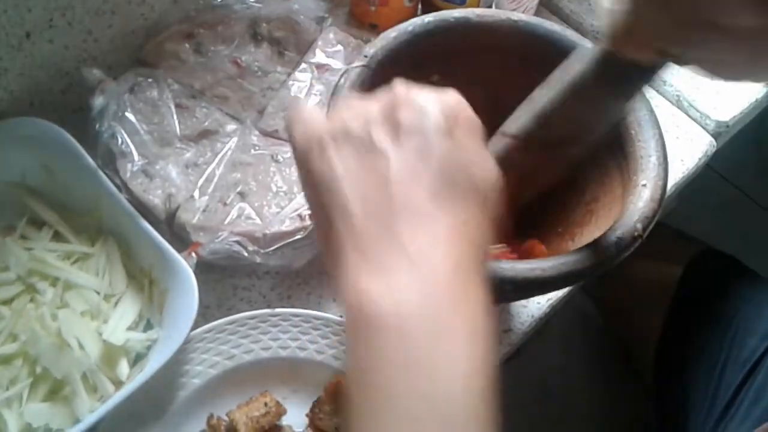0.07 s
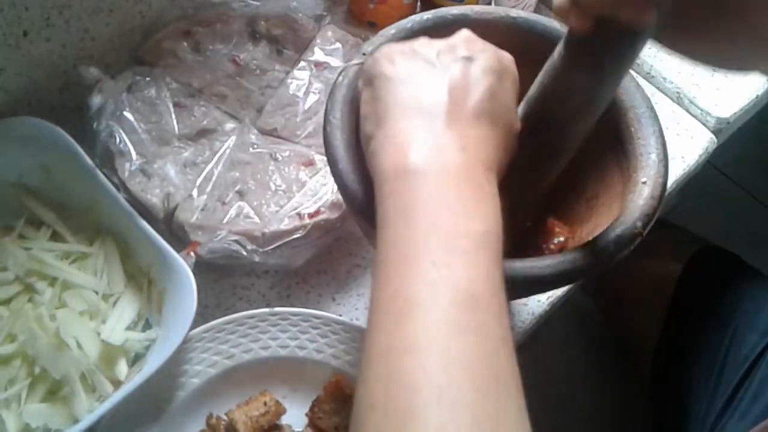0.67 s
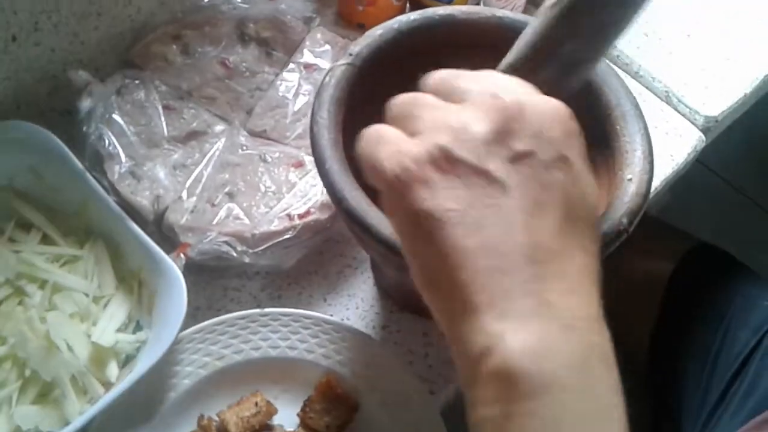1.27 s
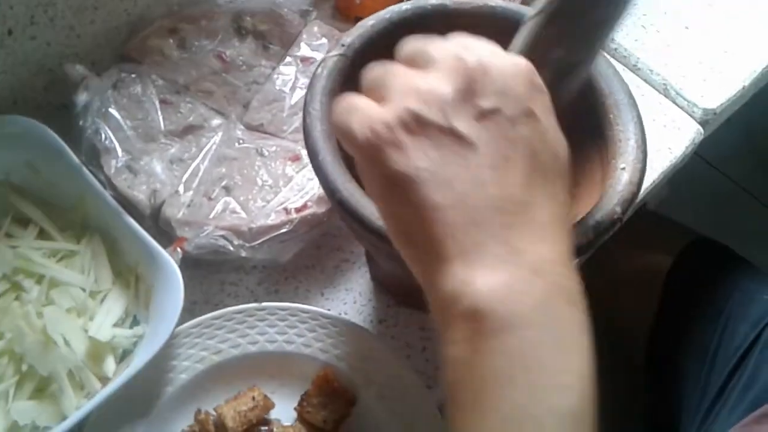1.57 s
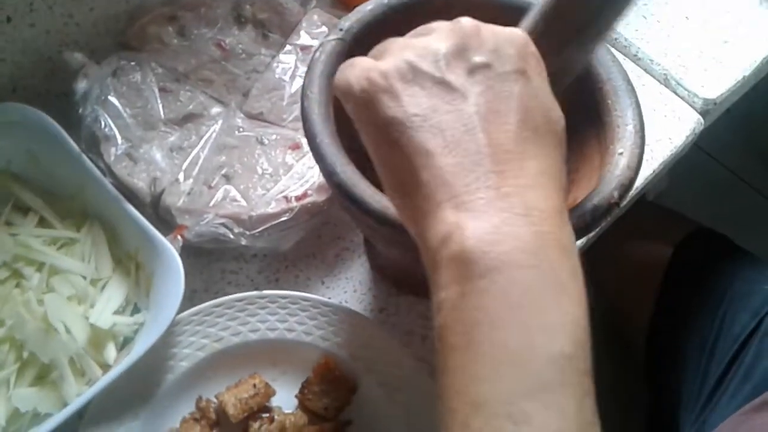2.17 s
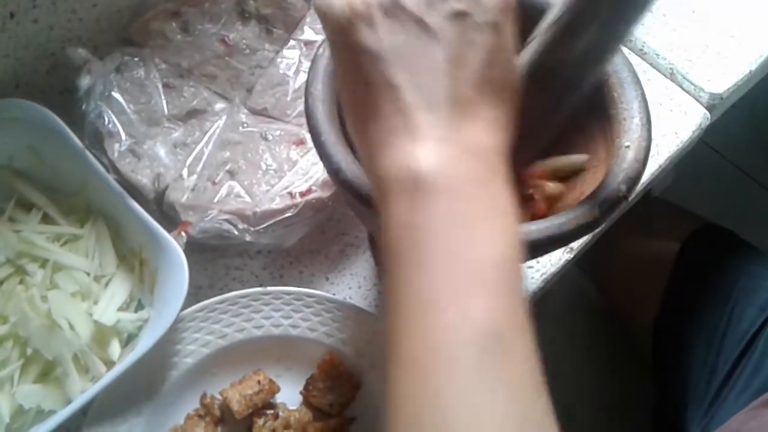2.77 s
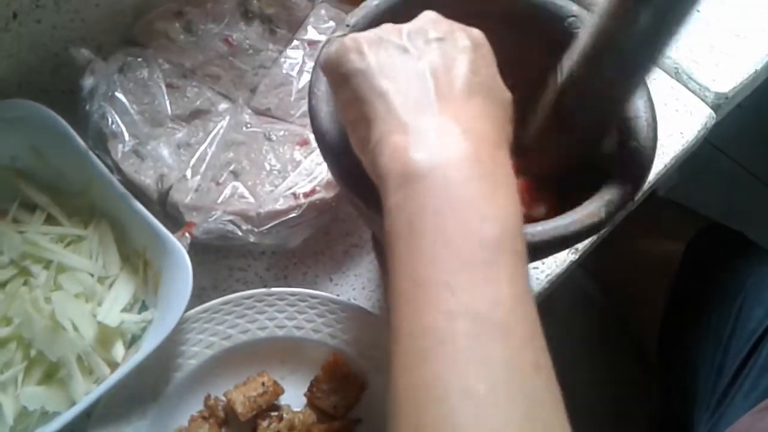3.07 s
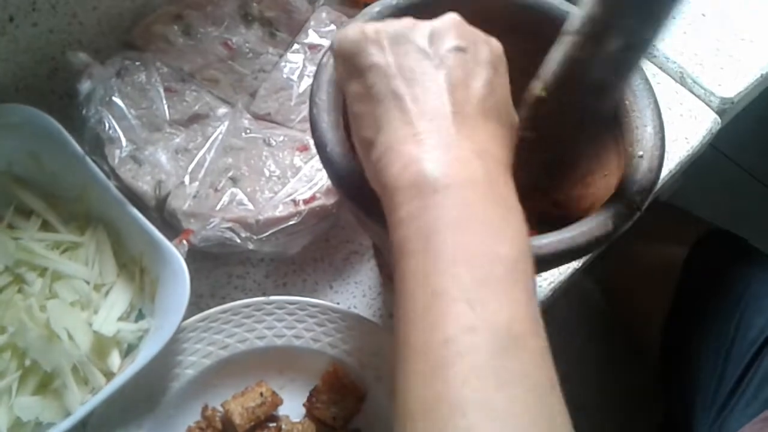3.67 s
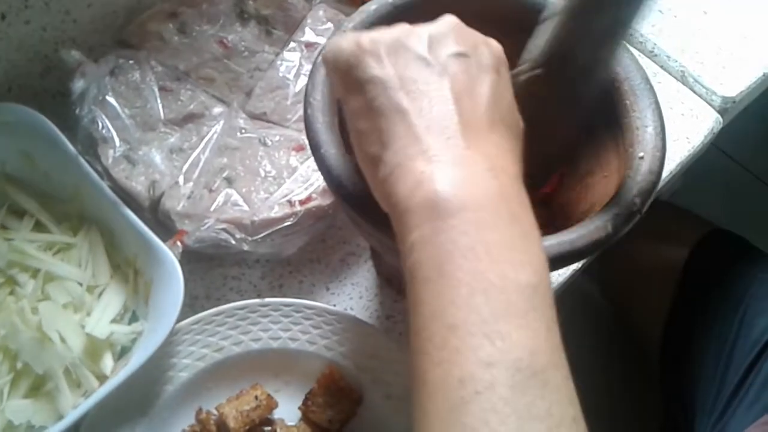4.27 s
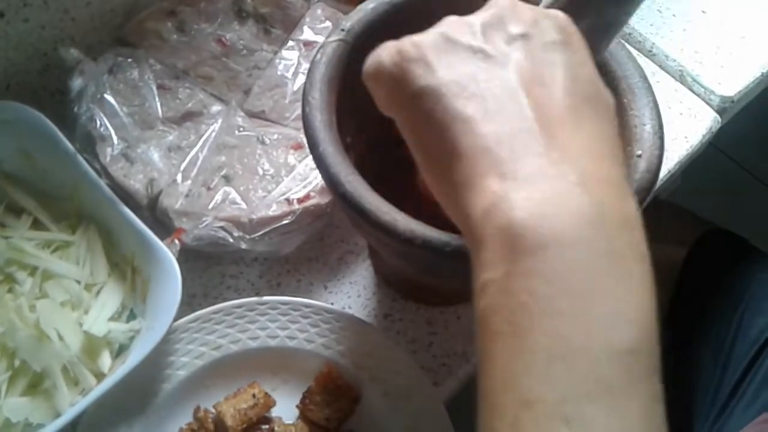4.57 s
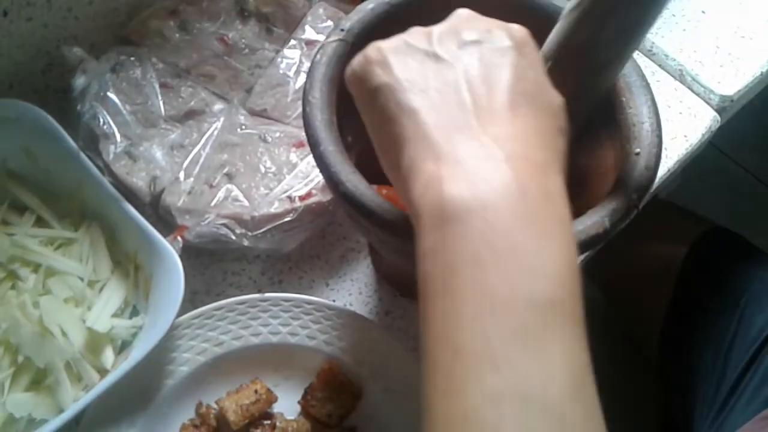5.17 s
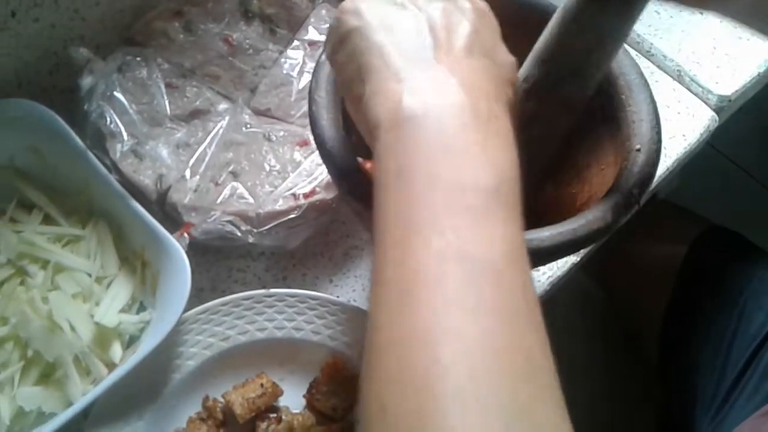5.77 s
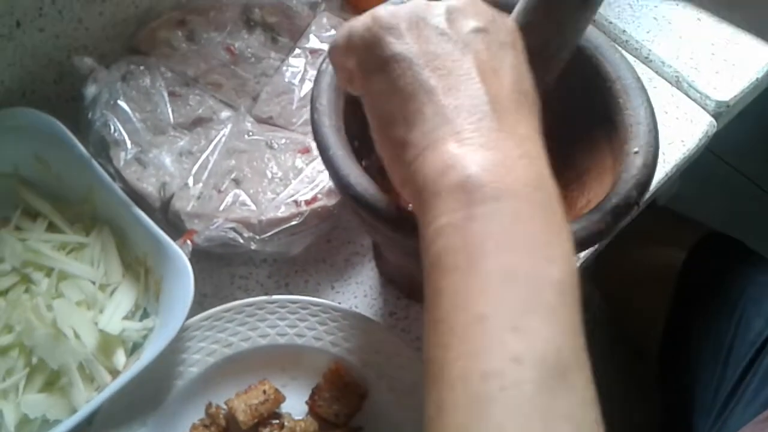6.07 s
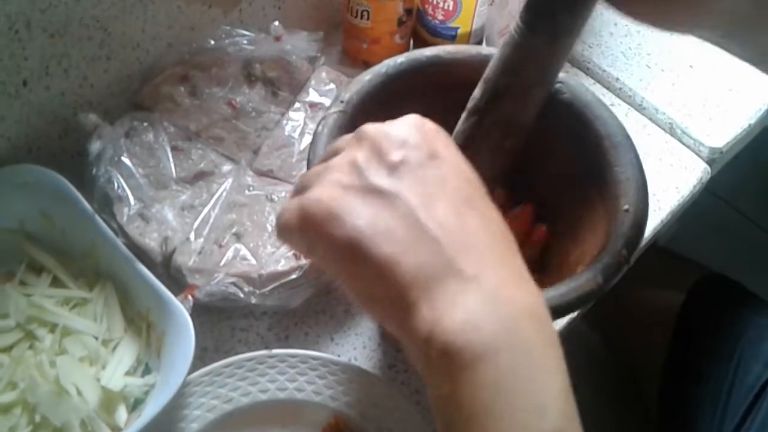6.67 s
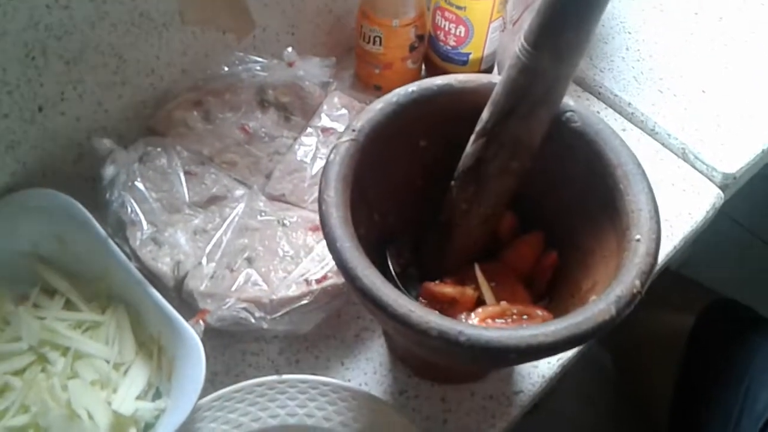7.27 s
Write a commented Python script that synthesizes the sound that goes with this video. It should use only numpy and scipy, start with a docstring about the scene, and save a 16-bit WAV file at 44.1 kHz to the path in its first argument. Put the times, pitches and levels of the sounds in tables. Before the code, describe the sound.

Tomato salad is pounded in a clay mortar, heard up close in a small kitchen. A wooden pestle lands in dull, uneven thuds while the fruit squelches about three times a second, with tiny snaps and squeaks. Between strokes a metal spoon scrapes the gritty wall, and occasionally the pestle knocks bare clay. At the end the spoon clinks brightly against the rim over a faint room hum.

```python
"""A wet squeak, a metal spoon scraping clay, then a squelch: tomato salad is being pounded in a mortar.
The wooden pestle crushes the fruit, snaps its skins and thuds into mortar and counter; between
strokes the spoon turns the salad along the wall. Now and then the pestle knocks the bare clay.
At the end the spoon is let go and clinks against the rim. A small kitchen hums and echoes around it."""
import sys
import numpy as np
from scipy import signal
from scipy.fft import rfft, irfft
from scipy.io import wavfile
from scipy.ndimage import uniform_filter1d, map_coordinates

SR = 44100
rng = np.random.default_rng(int(sys.argv[2]) if len(sys.argv) > 2 else 0)


def int16_out(signal):
    """Quantize to a 16-bit WAV file."""
    q = np.round(np.clip(np.atleast_2d(signal).T, -1, 1) * 32767)
    wavfile.write(sys.argv[1], SR, q.astype(np.int16))


N = 327222


def amp(db):
    """Decibels to gain."""
    return 10 ** (np.asarray(db) / 20)


def curve_at(points, hz):
    """Reads (Hz, value) points joined by straight lines on a log-frequency axis."""
    point_hz, value = np.transpose(points)
    return np.interp(np.log(hz + 1), np.log(point_hz + 1), value)


def add(mix, start_s, sound):
    """Mixes a sound in at its cue."""
    part = mix[max(round(start_s * SR), 0):][:len(sound)]
    part += sound[:len(part)]


def unit_rms(x):
    """Scales to rms 1."""
    return x / np.sqrt(np.mean(x ** 2) + 1e-20)


def wander(count, span):
    """Smooth random drift of rms near 1, with a new target every span points."""
    knots = rng.standard_normal(1024)
    return map_coordinates(knots, [np.arange(count) / span], order=2, mode="wrap")


def colour(x, eq, ripple_db=2, size=2048):
    """Minimum-phase EQ of unit energy; the ripple gives each contact its own chance resonances."""
    hz = np.fft.rfftfreq(size, 1 / SR)
    log_gain = np.log(amp(curve_at(eq, hz) + ripple_db * wander(len(hz), 11)))
    mirrored = np.concatenate([log_gain, log_gain[-2:0:-1]])
    taps = np.fft.ifft(np.exp(np.conj(signal.hilbert(mirrored)))).real
    return signal.fftconvolve(x, taps / np.linalg.norm(taps))


def crackle(envelope, spread_db, patchy_db=5):
    """Tiny ruptures of very uneven size under an envelope; each bubble bursts around its own pitch."""
    count = len(envelope)
    frames = dict(nperseg=128, noverlap=96)
    noise = signal.stft(rng.standard_normal(count), **frames)[2]
    specks = rng.standard_normal(noise.shape)
    bubbles = unit_rms(uniform_filter1d(uniform_filter1d(specks, 5, axis=0), 5, axis=1))
    fizz = signal.istft(noise * amp(patchy_db * np.minimum(bubbles, 2)), **frames)[1][:count]
    sizes = amp(spread_db * np.clip(wander(count, 40), -2, 2))
    pops = fizz * sizes * envelope
    return pops * np.linalg.norm(envelope) / np.linalg.norm(pops)


def ring(hz, db, t60):
    """Dying modes of alternating sign after one blow."""
    t = np.arange(SR * 2 // 5) / SR
    sign = (-1) ** np.arange(len(hz))
    decay = np.exp(-np.log(1000) * t / t60[:, None])
    return (sign * amp(db)) @ (decay * np.sin(2 * np.pi * hz[:, None] * t))


def detuned(hz, spread):
    """Nudges each mode off pitch by a random fraction."""
    return hz * (1 + spread * rng.standard_normal(len(hz)))


# The dark bed of room noise. Each row: frequency in Hz, relative level in dB.
ROOM_TONE_EQ = [(28, -10.5), (160, 3.5), (500, -4.5), (2000, -9), (7800, -17), (9500, -24), (15500, -30)]
def room_tone(noise_db=-45.5, hum_hz=96.0, hum_db=-62):
    """Steady room noise with a faint appliance hum."""
    gain = amp(curve_at(ROOM_TONE_EQ, np.fft.rfftfreq(N, 1 / SR)))
    noise = unit_rms(irfft(rfft(rng.standard_normal(N)) * gain, N))
    hum = np.sin(2 * np.pi * hum_hz * np.arange(N) / SR)
    return amp(noise_db) * noise + amp(hum_db) * hum


# Slipping skins. Each row: start and length in seconds, level in dB, first and last pitch in Hz.
SKIN_SQUEAKS = [(0.04, 0.034, -34.5, 5630, 4930), (1.782, 0.0077, -19, 2210, 2550),
                (3.624, 0.032, -28.5, 5950, 5600), (4.442, .031, -31.5, 1258, 2030),
                (4.48, 0.0033, -21.5, 2590, 2900)]
def skin_squeaks(waver=0.02, rough_db=5.0):
    """Wet skin sticks and slips: a short, rough tone that glides."""
    out = np.zeros(N)
    for start, length, db, first_hz, last_hz in SKIN_SQUEAKS:
        count = max(round(length * SR), 100)
        hz = np.geomspace(first_hz, last_hz, count) * (1 + waver * wander(count, 30))
        grip = amp(rough_db * wander(count, 90)) * signal.windows.tukey(count, .5)
        tone = np.sin(2 * np.pi * np.cumsum(hz) / SR)
        add(out, start, amp(db) * unit_rms(grip * tone))
    return out


# Gritty clay and hissing wet shreds. Each row: frequency in Hz, relative level in dB.
CLAY_RASP_EQ = [(300, -16), (600, 6.5), (900, -3), (1180, -2.5), (1680, 3.5), (2850, -9.5), (4000, -13.5),
                (7000, -38)]
SHRED_HISS_EQ = [(2000, -12), (3000, -3), (5600, -1), (7800, -3), (8900, -11), (12000, -10), (16000, -20)]
# The blade pressed on the wall. Each row: mode in Hz, relative level in dB, t60 in seconds.
BLADE_MODES = [(1174, -15, 0.17), (2796, -2.5, 0.036), (4596, 0, 0.027), (5620, 4.5, 0.016),
               (7760, 3.5, 0.014)]
# Strokes along the wall. Each row: start and length in seconds, rasp in dB (how hard the spoon
# bears on the clay), base level of blade and shreds in dB.
SPOON_STROKES = [(0.046, 0.21, -43, -41), (0.51, 0.072, -46.5, -38), (0.617, 0.14, -45.5, -40),
                 (1.108, 0.023, -62, -53), (1.448, 0.083, -65, -37.5), (1.811, 0.062, -32, -42),
                 (2.5, 0.084, -31.5, -38.5), (3.095, 0.059, -56, -49.5), (3.159, 0.099, -34, -38),
                 (3.55, 0.17, -50, -39), (3.79, 0.098, -36.5, -42), (4.259, 0.055, -51, -41.5),
                 (4.415, 0.069, -32, -38), (4.944, 0.092, -52, -43), (5.352, 0.072, -34, -43),
                 (5.512, 0.12, -57, -38.5), (5.65, 0.11, -33.5, -36.5), (6.026, 0.055, -43, -37.5),
                 (6.255, 0.064, -65, -40), (6.657, 0.039, -28, -39), (7.046, 0.095, -43.5, -37)]
def spoon_scrapes(catch_db=2.5, slacken_db=-4, touch_db=3, sing_db=-2, hiss_db=2.5):
    """The held spoon lands with a dull clink, then catches on grit and shreds that keep it singing."""
    out = np.zeros(N)
    hz, mode_db, t60 = np.transpose(BLADE_MODES)
    grain = dict(spread_db=4.0, patchy_db=4.5)
    for start, length, rasp_db, level_db in SPOON_STROKES:
        count = max(round(length * SR), 200)
        pressure_db = slacken_db * np.linspace(0, 1, count) + catch_db * wander(count, 400)
        pressure = unit_rms(amp(pressure_db)) * signal.windows.tukey(count, .04)
        blade = ring(detuned(hz, 0.025), mode_db, t60)  # each grip retunes the blade a little
        singing = signal.fftconvolve(crackle(pressure, **grain), blade / np.linalg.norm(blade))
        add(out, start, amp(level_db + touch_db) * blade)
        add(out, start, amp(level_db + sing_db) * singing)
        for eq, db in (CLAY_RASP_EQ, rasp_db), (SHRED_HISS_EQ, level_db + hiss_db):
            add(out, start, amp(db) * colour(crackle(pressure, **grain), eq))
    return out


# A squelch's hollow lows, pulpy mids and bright top. Each row: frequency in Hz, relative level in dB.
GULP_EQ = [(120, -44), (250, -16.5), (480, -22.5), (600, -3.5), (710, -5), (1000, -19.5), (1240, -9),
           (1450, -18), (2500, -68.5)]
PULP_EQ = [(500, -57), (1000, -13), (1280, -3), (2200, 3), (3100, -3), (4200, -11.5), (8000, -45)]
SPRAY_EQ = [(1800, -35), (3400, -1), (4400, 4), (7700, 5.5), (9000, -5), (11500, -2.5), (16000, -16.5)]
# Fruit giving way. Each row: climax and swell time in seconds, pulp level in dB, juiciness in dB
# (more spray, less gulp).
FRUIT_CRUSHES = [(0.141, 0.0097, -33, 2.5), (0.424, 0.0069, -25.5, 1.5), (0.949, 0.01, -25.5, 2.5),
                 (1.183, 0.015, -25, -2.5), (1.487, 0.011, -26.5, 1), (1.787, 0.013, -26, 3.5),
                 (1.811, 0.0092, -22.5, 2), (2.03, 0.014, -28, 1), (2.285, .012, -25, -3.5),
                 (2.496, 0.0027, -35, 13.5), (2.584, 0.0058, -21.5, -1.5), (2.897, 0.015, -25, 3),
                 (3.235, 0.0034, -27, -4), (3.554, 0.0029, -24, -2), (3.89, 0.02, -34.5, 4),
                 (4.164, 0.01, -24, 1), (4.485, 0.0099, -30, 3), (4.763, 0.011, -27.5, -1.5),
                 (5.055, 0.0088, -26, 0), (5.171, 0.0023, -31.5, -3.5), (5.415, 0.0042, -25.5, -1),
                 (6.066, 0.009, -37, -6.5), (6.412, 0.0044, -28, 1.5)]
def squelches(spray_db=-1, fall_s=0.0061, ooze=0.54, ooze_s=0.015, cling_s=.045, cling_db=-25):
    """Wet skins cling, then crackle swells, stops short and oozes on; air in the bowl adds a gulp."""
    out = np.zeros(N)
    t = np.arange(-cling_s, .15, 1 / SR)  # zero at the climax
    after = np.maximum(t, 0)
    release = (1 - ooze) * np.exp(-(after / fall_s) ** 2 / 2) + ooze * np.exp(-after / ooze_s)
    for climax, swell_s, level_db, juice_db in FRUIT_CRUSHES:
        swell = np.exp(np.minimum(t, 0) / swell_s)
        envelope = np.where(t < -2 * swell_s, amp(cling_db), swell * release)
        for eq, db in (GULP_EQ, -juice_db), (PULP_EQ, 0), (SPRAY_EQ, spray_db + juice_db):
            wet = colour(crackle(envelope, spread_db=5.5), eq)
            wet *= np.linalg.norm(envelope) / np.linalg.norm(wet)
            add(out, climax - cling_s, amp(level_db + db) * wet)
    return out


# Skins and juice films breaking. Each row: start in seconds, relative level in dB, pitch in Hz.
SKIN_SNAPS = [(0.4165, -12, 5430), (0.428, -22, 6360), (0.513, -11.5, 6760), (0.612, -18, 6800),
              (0.66, -12.5, 6240), (0.67, -18, 7500), (1.771, -14, 6500), (2.01, -19, 6000),
              (2.028, -17, 10200), (2.188, -31, 3130), (2.582, -14, 3000), (2.8705, -19.5, 4760),
              (2.893, -10, 5100), (2.965, -22, 2360), (3.16, -22, 7500), (3.5344, -26, 4200),
              (3.578, -13, 7600), (3.792, -23, 7000), (4.137, -25.5, 7000), (4.9423, -22.5, 7000),
              (5.001, -20, 6430), (5.5135, -11, 6750), (5.622, -12, 5200), (5.729, -13, 5700),
              (6.22, -22, 6260), (6.257, -22, 5400), (6.414, -17.5, 3500), (6.854, -14.5, 5040)]
def skin_snaps(gain_db=-2, decay_s=0.0028, focus_db=8, click_db=-6):
    """Each film breaks with one sharp click in a brief fizz, both centred on its pitch."""
    out, t = np.zeros(N), np.arange(600) / SR
    for start, db, hz in SKIN_SNAPS:
        eq = [(hz / 4, -22), (hz / 2, -focus_db), (hz, 0), (hz * 1.25, -focus_db), (hz * 3, -19)]
        burst = crackle(np.exp(-t / decay_s), spread_db=2)
        burst[20] += amp(click_db) * np.linalg.norm(burst)
        add(out, start, amp(db + gain_db) * colour(burst, eq))
    return out


# The mortar on the counter. Each row: mode in Hz, relative level in dB, t60 in seconds.
COUNTER_MODES = [(98.8, -20.5, 0.37), (147.1, -4.5, 0.27), (203.7, 1.5, 0.21), (231.5, -1, 0.15),
                 (264.2, -2.5, 0.16), (352.2, 0.5, 0.086), (447.2, -15, 0.38), (592, 3, 0.04),
                 (717, -14, 0.11), (1108, -5.5, 0.032)]
# The pestle landing in the salad. Each row: start in seconds, relative level in dB, hardness in dB
# (a lift of the upper modes).
PESTLE_BLOWS = [(0.705, -35.5, 8.5), (0.984, -27.5, 4), (1.371, -34.5, -6), (1.481, -24.5, 6),
                (1.535, -29.5, 13), (1.559, -29, 15), (1.701, -30.5, 11.5), (1.799, -24.5, 6),
                (2.312, -27, 3.5), (2.503, -27.5, 2), (2.615, -25.5, 11), (2.68, -25, 2), (3.161, -24, 5),
                (3.232, -28.5, 16), (3.553, -35, 15), (3.577, -25.5, -5), (3.792, -25, -4),
                (3.889, -29.5, -20), (4.416, -23, -1), (4.497, -30, -3), (4.77, -25, 3), (5.452, -27, 13.5),
                (5.522, -23.5, 12), (5.543, -22.5, -2), (5.648, -22, 5.5), (6.088, -24.5, 7),
                (6.152, -25, 0.5), (6.66, -20, 4.5), (6.805, -24, 10.5), (6.912, -24.5, -1.5)]
def pestle_thuds(gain_db=-0.96, detune=0.037, uneven_db=3.0, cushion_s=0.00062,
                 rock_s=.02, rock_db=-10, rock_hard_db=-6):
    """Blows sink into the food and rock mortar and counter, which settle with a duller bump."""
    out = np.zeros(N)
    hz, db, t60 = np.transpose(COUNTER_MODES)
    upper = curve_at([(260, 0), (580, 1)], hz)  # how far hardness reaches each mode
    rocks = [(start + rock_s * rng.uniform(0.811, 1.2), level_db + rock_db, hard_db + rock_hard_db)
             for start, level_db, hard_db in PESTLE_BLOWS]
    for start, level_db, hard_db in PESTLE_BLOWS + rocks + grinding_bumps():
        shift, share = rng.standard_normal((2, len(hz)))  # load and striking spot vary the modes
        mode_db = db + hard_db * upper + uneven_db * share
        blow = ring(hz * (1 + detune * shift), level_db + mode_db, t60)
        attack = 1 - np.exp(-np.arange(len(blow)) / SR / cushion_s)
        add(out, start, blow * attack)
    return amp(gain_db) * out


# Long, grinding pushes. Each row: start and length in seconds, relative level in dB.
PESTLE_PUSHES = [(1.499, 0.25, -37.5), (2.55, 0.15, -28), (3.189, 0.18, -29.5), (4.435, 0.083, -31.5),
                 (5.35, 0.23, -34), (6.119, 0.21, -38.5)]
def grinding_bumps(per_second=46, jitter=0.31, spread_db=4.5, hard_db=-2):
    """The pestle stumbles over the pieces as it grinds: cues for soft, unevenly spaced thuds."""
    cues = []
    for start, length, db in PESTLE_PUSHES:
        chance = rng.standard_normal((40, 2))
        for k, (late, size) in enumerate(chance[:round(length * per_second)]):
            cues.append((start + (k + jitter * abs(late)) / per_second, db + spread_db * size, hard_db))
    return cues


# The mortar's wall. Each row: mode in Hz, relative level in dB, t60 in seconds.
CLAY_MODES = [(606, -9, 0.033), (1132, -5, 0.3), (1161, 3.5, 0.12), (1355, -2, 0.023), (1730, -1, 0.034),
              (2880, -12, 0.056)]
# Hits on bare clay. Each row: start in seconds, level in dB, hardness in dB, ring as a factor on t60
# (longer when the pestle lifts away).
CLAY_KNOCKS = [(3.460, -16.5, -13, 0.85), (3.791, -26.5, 3, 0.65), (4.416, -27, 2, 0.78),
               (5.65, -18, 0.5, 1.63), (6.805, -22.5, 5, 1.57)]
def clay_knocks(chatter_db=4.0, hard_above_hz=1500, crunch_db=-6, crunch_s=.012):
    """Wood crunches on gritty clay and rings the wall; two modes beat, and chatter roughens the ring."""
    out, t = np.zeros(N), np.arange(SR // 10) / SR
    hz, db, t60 = np.transpose(CLAY_MODES)
    for start, level_db, hard_db, sustain in CLAY_KNOCKS:
        mode_db = level_db + db + hard_db * (hz > hard_above_hz)
        wall = ring(detuned(hz, 0.0052), mode_db, t60 * sustain)
        add(out, start, wall * amp(chatter_db * wander(len(wall), 220)))
        crunch = colour(crackle(np.exp(-t / crunch_s), spread_db=2), CLAY_RASP_EQ)
        add(out, start, amp(level_db + hard_db + crunch_db) * crunch)
    return out


# The free spoon. Each row: mode in Hz, t60 in seconds, relative dB struck at the neck and at the bowl.
SPOON_MODES = [(2780, 0.13, -9.5, -17), (4010, 0.18, 0, -38), (5130, 0.19, -30, 0),
               (5500, 0.062, -14, -0.5), (6160, 0.14, -0.5, -10), (7300, 0.29, 5.5, -19),
               (8100, 0.083, -27, -7), (8800, 0.17, -14, -7), (10840, 0.29, -12, -30),
               (11500, 0.13, -13, 12.5), (12700, 0.18, -21, -9), (14400, .11, -21, 1)]
def spoon_ring(level_db, place, sustain, grip_db=-40, treble_hz=8500, twin_db=-11):
    """The spot struck picks the modes and wakes weaker twins; a grip shortens them and mutes the top."""
    hz, t60, neck_db, bowl_db = np.transpose(SPOON_MODES)
    muted_db = grip_db * (1 - sustain) ** 2 * (hz > treble_hz)
    db = level_db + neck_db + place * (bowl_db - neck_db) + muted_db
    twins = ring(detuned(hz, 0.029), db + twin_db, t60 * sustain / 2)
    return ring(hz, db, t60 * sustain) + twins


# The crack of metal on clay. Each row: frequency in Hz, relative level in dB.
CRACK_EQ = [(900, -10), (3000, -4.5), (7500, -7.5), (9500, 0), (14500, -30), (16500, 9.5)]
# The spoon hitting the rim. Each row: start in seconds, ring level in dB, place from 0 (neck) to
# 1 (bowl), crack level in dB, sustain as a factor on t60.
RIM_CLINKS = [(6.836, -16, 0.11, -9.5, 0.36), (6.978, -20, 0.076, -21, 0.97),
              (7.016, -18.5, 0.87, -36, 0.49), (7.0397, -11, 0.74, -6, 0.66)]
def spoon_clinks(crack_s=0.01, neck_dull_db=-12, treble_hz=8500):
    """The spoon cracks against the rim and rings; its thin bowl cracks brighter than its neck."""
    out, t = np.zeros(N), np.arange(SR // 20) / SR
    for start, ring_db, place, crack_db, sustain in RIM_CLINKS + spoon_bounces():
        eq = [(hz, db + neck_dull_db * (1 - place) * (hz > treble_hz)) for hz, db in CRACK_EQ]
        add(out, start, spoon_ring(ring_db, place, sustain))
        crack = colour(crackle(np.exp(-t / crack_s), spread_db=1.5), eq)
        add(out, start, amp(crack_db) * crack)
    return out


def spoon_bounces(count=8, gap_s=0.02, shrink=.93, bounce_db=-15, soften_db=-8, sustain=0.36):
    """The dropped spoon settles: cues for faint, ever quicker clinks with a softer crack."""
    start, ring_db, _, crack_db, _ = RIM_CLINKS[-1]
    cues = []
    for k, place in enumerate(rng.uniform(0.56, 1, count)):
        start += gap_s * shrink ** k
        cues.append((start, ring_db + bounce_db, place, crack_db + bounce_db + soften_db, sustain))
    return cues


# The kitchen's short tail. Each row: frequency in Hz, t60 in seconds.
KITCHEN_DECAY = [(150, 0.57), (500, 0.46), (1500, 0.56), (4000, 0.36), (8000, 0.3), (15000, 0.22)]
def kitchen_reverb(send):
    """Sparse reflections from counter and tiled walls, each band dying at its own speed."""
    taps = np.zeros(SR // 2)
    slots = np.arange(180, len(taps) - 20, 20)  # one reflection somewhere in every 20 samples
    taps[slots + rng.integers(0, 20, len(slots))] = rng.choice([-1., 1.], len(slots))
    hz, t, bands = signal.stft(taps, SR, nperseg=256)
    decay = np.exp(-np.log(1000) * t / curve_at(KITCHEN_DECAY, hz)[:, None])
    tail = signal.istft(bands * decay, SR)[1]
    return signal.fftconvolve(send, tail / np.linalg.norm(tail))[:N]


def scene(thud_send_db=-10, wet_send_db=-9, ring_send_db=-12):
    """The mortar close up, in mono, with the kitchen around it."""
    thuds = pestle_thuds()
    wet = squelches() + skin_squeaks() + spoon_scrapes() + skin_snaps()
    ringing = clay_knocks() + spoon_clinks()
    send = amp(thud_send_db) * thuds + amp(wet_send_db) * wet + amp(ring_send_db) * ringing
    return (thuds + wet + ringing + kitchen_reverb(send) + room_tone())[None]


def record(dry, bass_hz=80, ceiling=1.2, top_hz=16000):
    """A small microphone loses the deep bass and rounds the highest peaks; the very top is cut off."""
    thin = signal.sosfilt(signal.butter(2, bass_hz, "high", fs=SR, output="sos"), dry)
    rounded = ceiling * np.tanh(thin / ceiling)
    lowpass = signal.firwin(401, top_hz, window=("kaiser", 9), fs=SR)
    return signal.oaconvolve(rounded, lowpass[None], "same")


dry = scene()
out = record(dry)
int16_out(out)
```